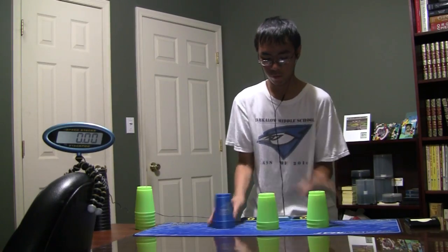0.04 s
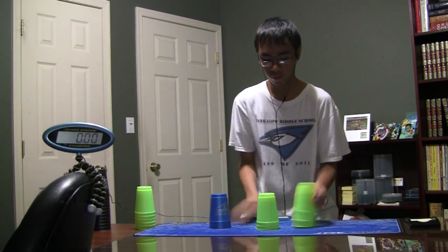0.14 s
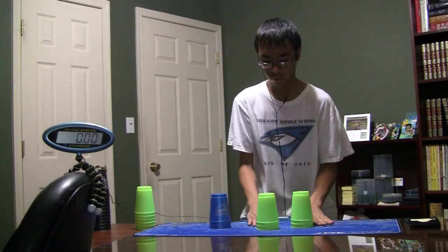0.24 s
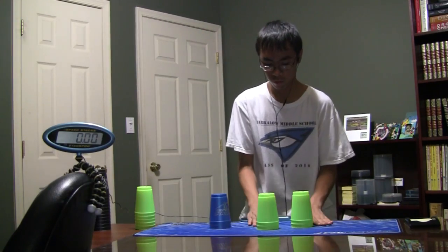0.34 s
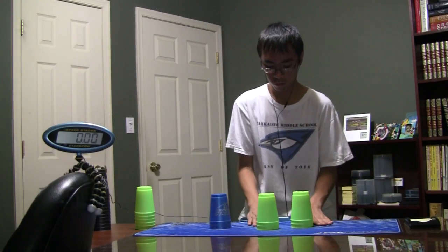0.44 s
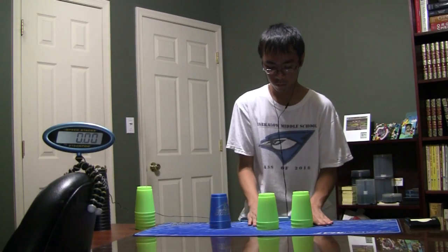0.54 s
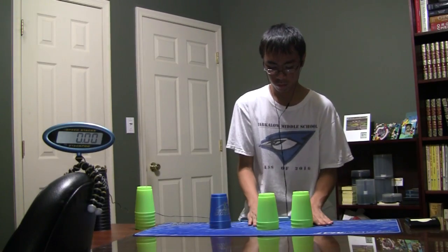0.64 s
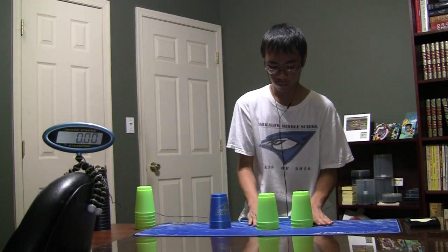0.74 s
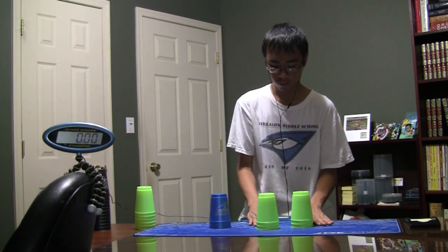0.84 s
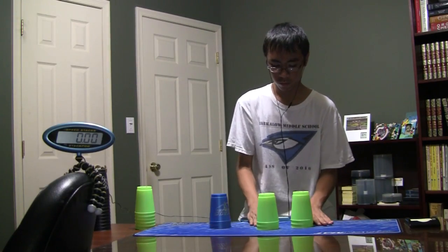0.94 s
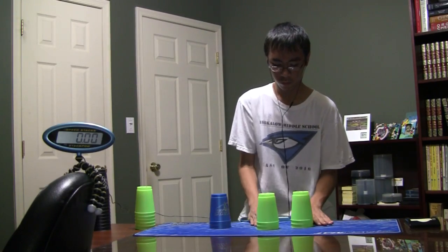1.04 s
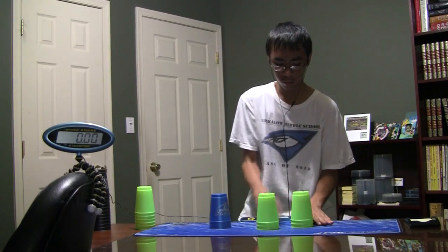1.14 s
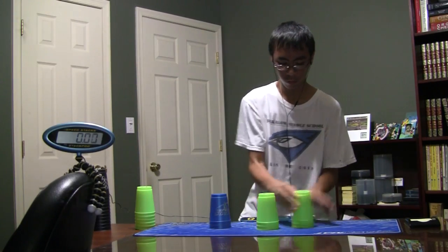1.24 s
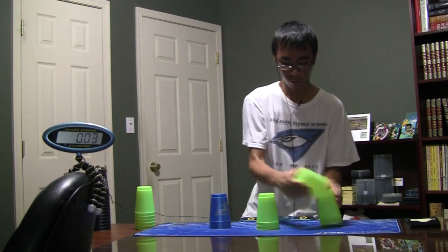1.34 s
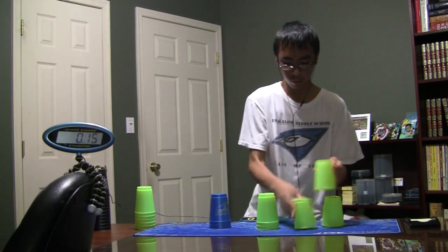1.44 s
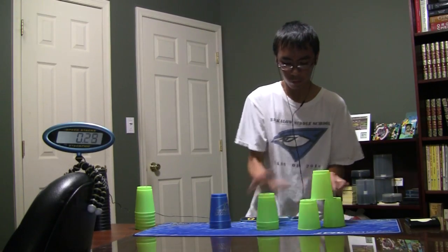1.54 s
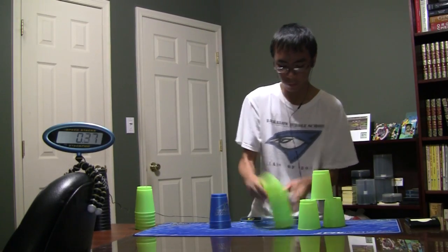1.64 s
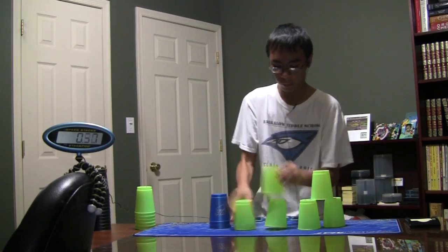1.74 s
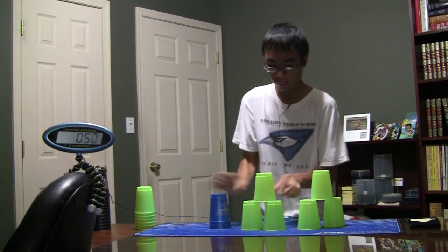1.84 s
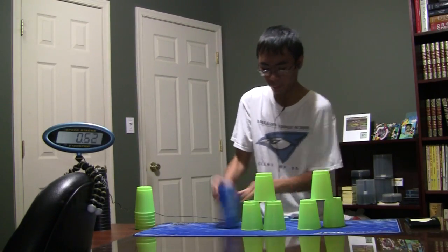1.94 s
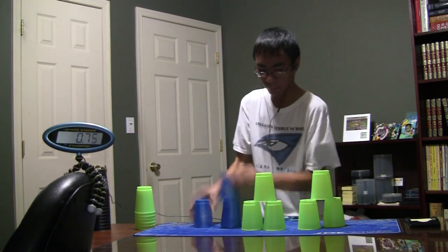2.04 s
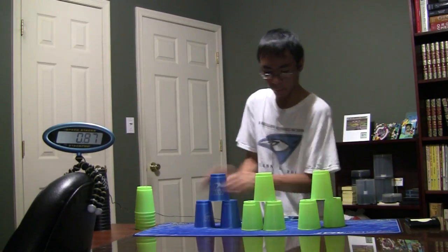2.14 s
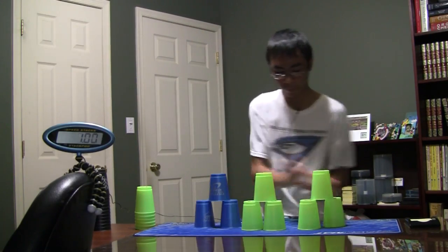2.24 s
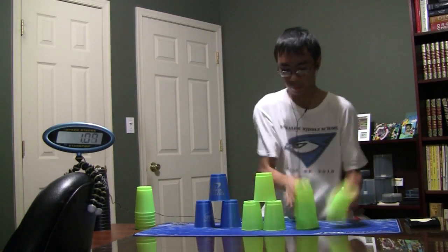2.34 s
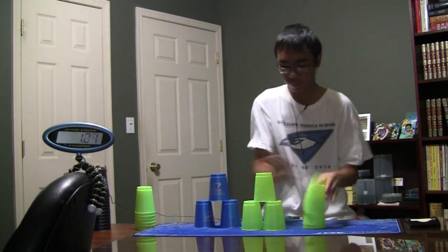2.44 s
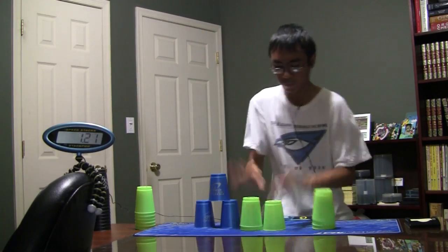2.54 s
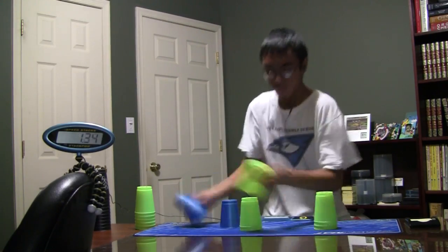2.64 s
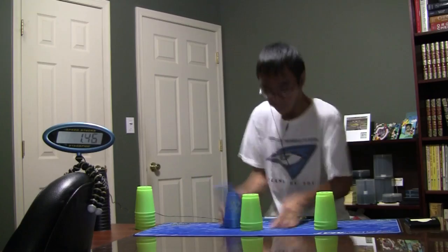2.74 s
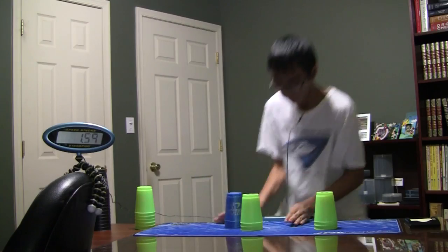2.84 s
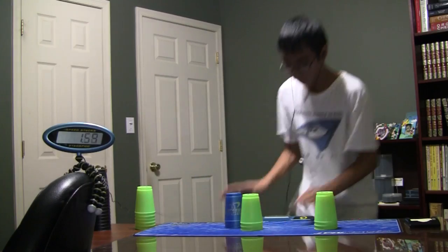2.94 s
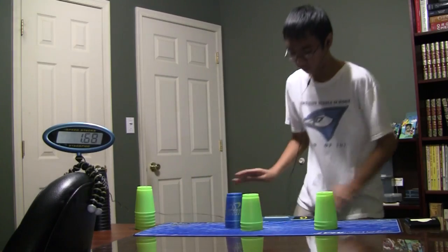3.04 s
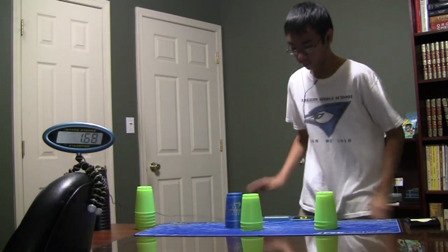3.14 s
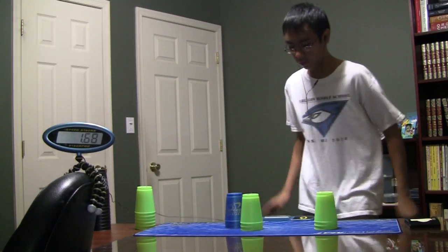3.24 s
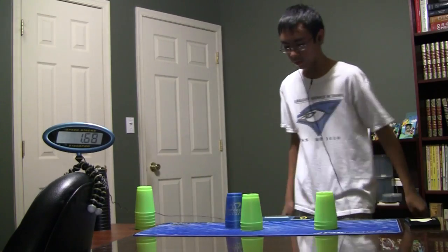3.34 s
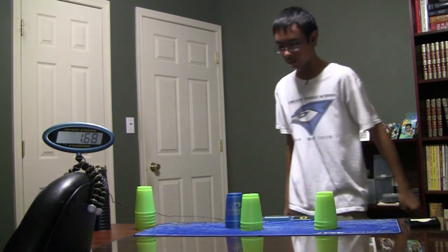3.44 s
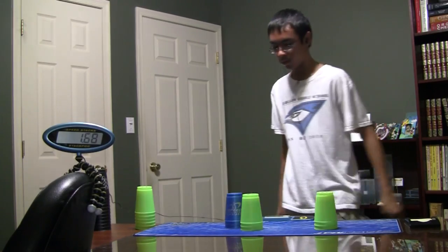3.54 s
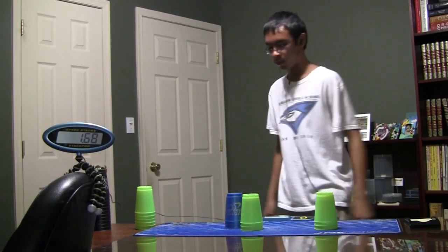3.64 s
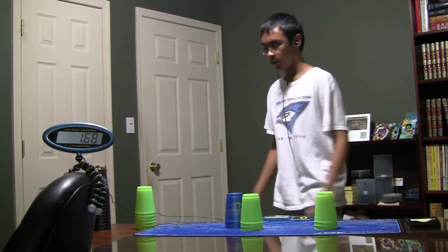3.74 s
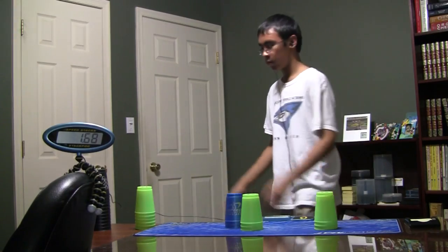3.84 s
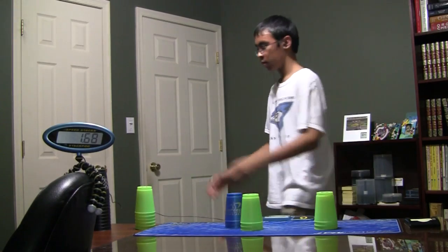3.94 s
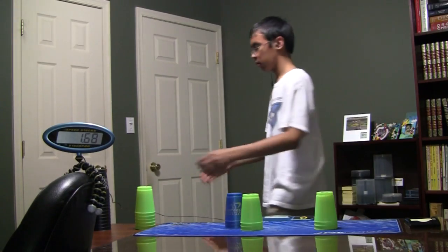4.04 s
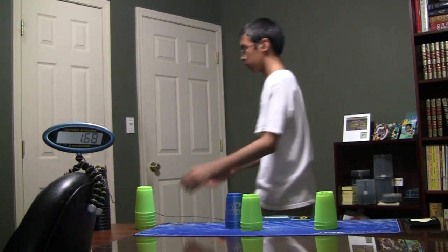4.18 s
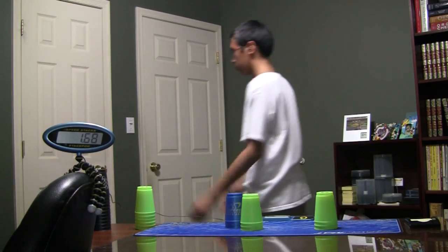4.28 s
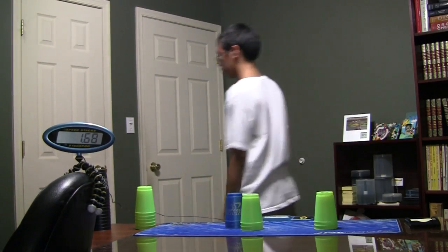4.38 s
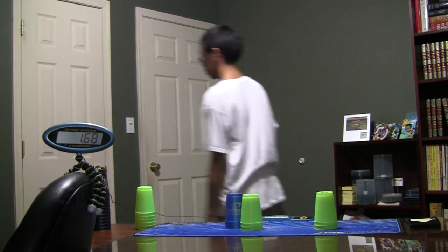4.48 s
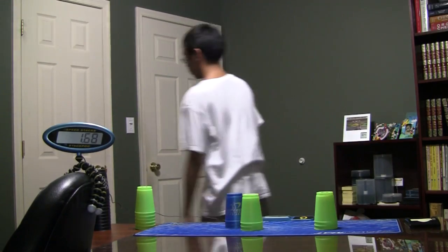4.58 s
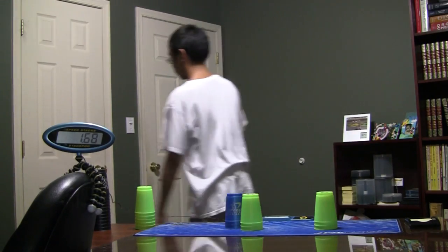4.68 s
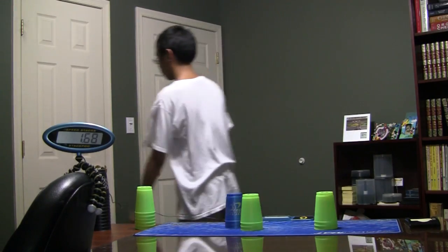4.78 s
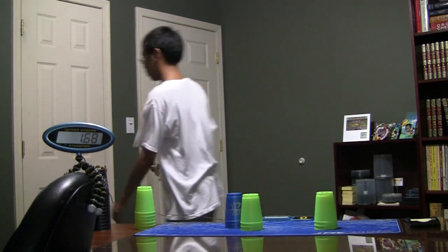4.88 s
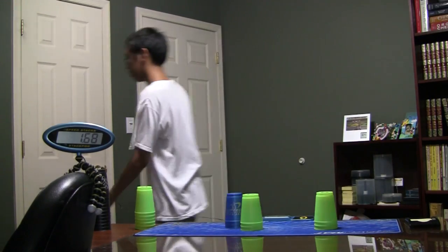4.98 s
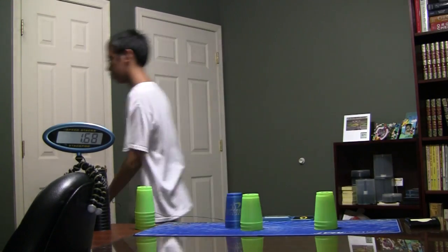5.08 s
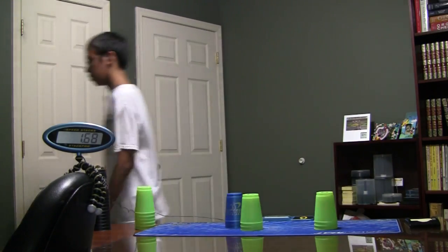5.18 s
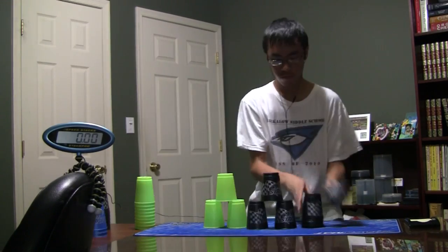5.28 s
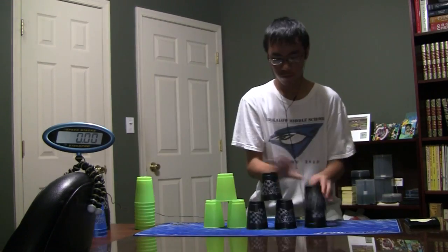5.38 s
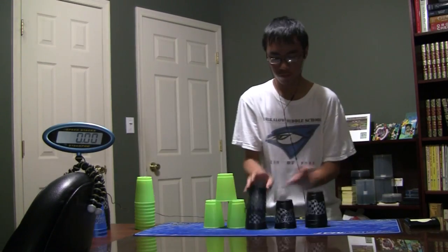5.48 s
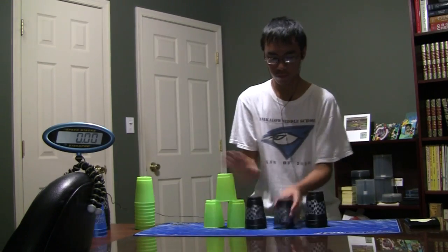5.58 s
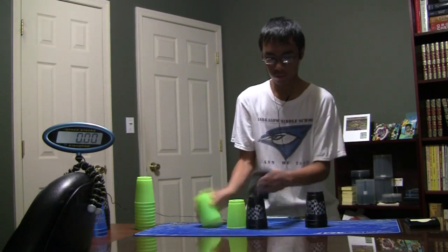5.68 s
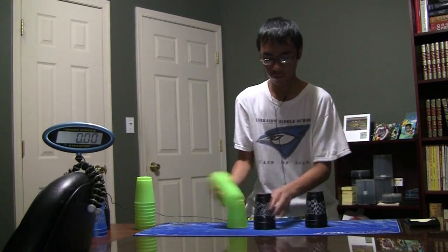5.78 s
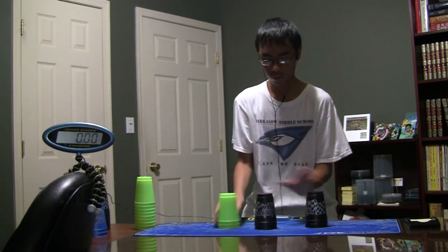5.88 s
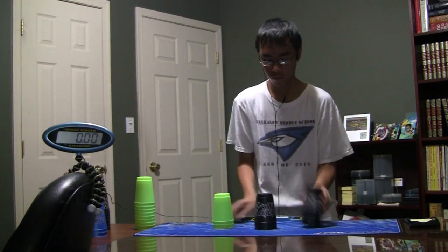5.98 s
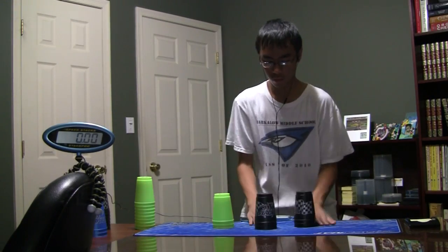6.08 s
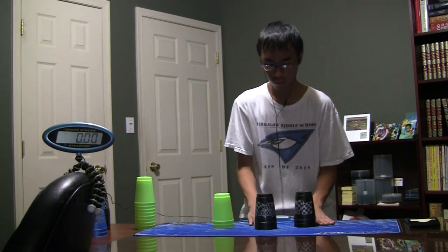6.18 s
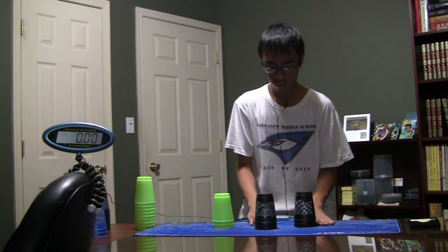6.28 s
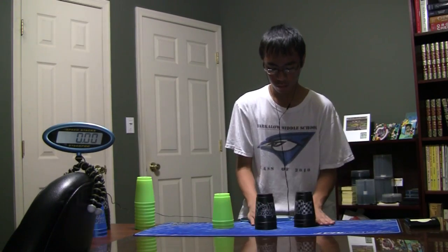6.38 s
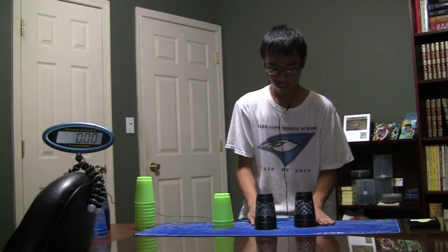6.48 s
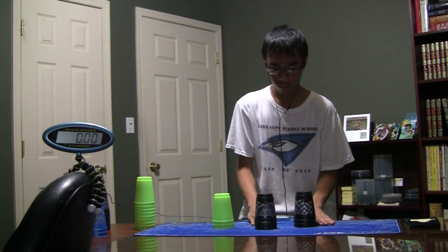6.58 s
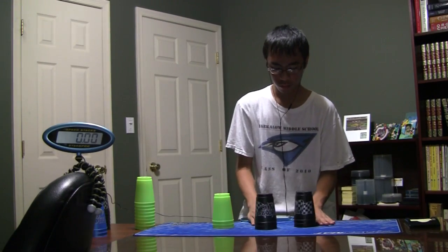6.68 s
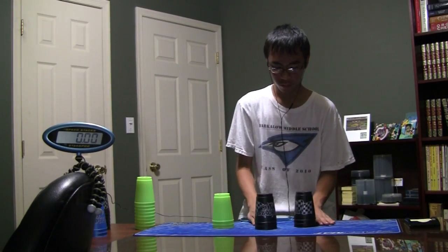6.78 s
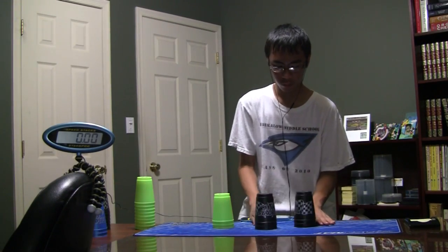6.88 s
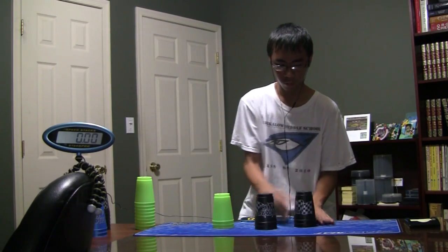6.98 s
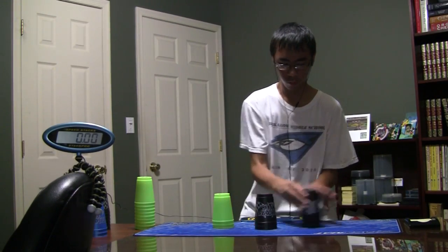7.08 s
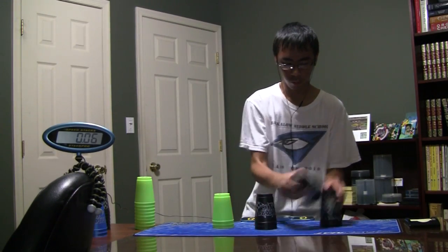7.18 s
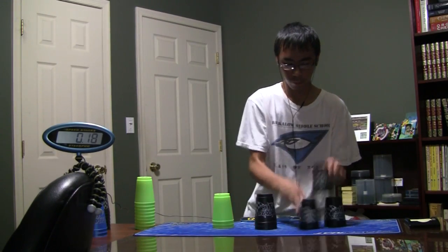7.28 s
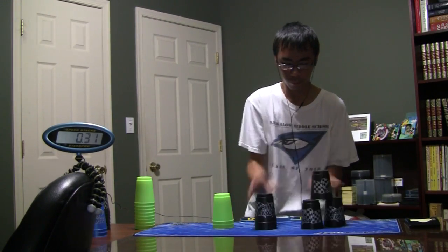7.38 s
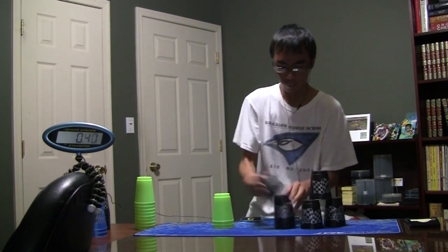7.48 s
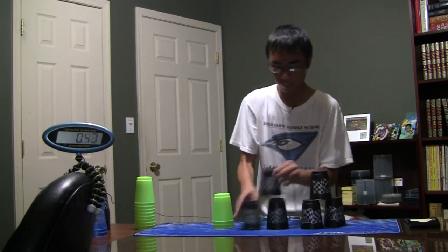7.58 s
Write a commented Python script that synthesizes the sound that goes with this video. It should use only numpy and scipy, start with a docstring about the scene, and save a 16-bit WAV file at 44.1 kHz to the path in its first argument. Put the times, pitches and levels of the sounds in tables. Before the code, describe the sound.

Rapid hollow clacks and scrapes of light plastic cups being stacked and collapsed, separated by low room noise, a soft step and a scuff.

```python
"""Stacking cups in a hard room

Plastic cups are built into pyramids and collapsed on a mat in quick runs, in a small hard room.
Each contact rings the air in a cup, clacks and cracks its wall with filtered noise, and thuds the table.
Sparse random clicks make the hiss and scrape of sliding cups and the scuff of a foot; a step booms low.
Filtered noise lies steadily under the pauses; the loudest hits overload the input."""
import sys
import numpy as np
from scipy import signal
from scipy.fft import rfft, irfft
from scipy.io import wavfile
from scipy.ndimage import uniform_filter1d

SR = 44100
rng = np.random.default_rng(int(sys.argv[2]) if len(sys.argv) > 2 else 0)


def waveform_to_disk(signal):
    """Save audio, clipped to [-1, 1], as 16-bit WAV at the path in sys.argv[1]."""
    frames = np.transpose(np.atleast_2d(signal))
    scaled = np.clip(frames, -1, 1) * 32767
    samples = np.round(scaled).astype(np.int16)
    wavfile.write(sys.argv[1], SR, samples)


N = 336042
FIRST_S = 0.015   # opening stretch of a contact over which its level is set


def from_db(db):
    """Gain of a level in dB."""
    return 10 ** (np.asarray(db) / 20)


def rms_one(x):
    """Scaled to rms 1."""
    return x / np.sqrt(np.mean(x ** 2) + 1e-20)


def firm(x):
    """Scaled to rms 1 over its first moments."""
    return x / np.sqrt(np.mean(x[..., :int(FIRST_S * SR)] ** 2) + 1e-20)


def decay(t, t60_s):
    """Exponential decay, 60 dB down after t60."""
    return from_db(-60 * t / t60_s)


def ring(t, hz, t60_s, rise_s):
    """A resonance: damped sine with a short rise."""
    return np.sin(2 * np.pi * hz * t) * decay(t, t60_s) * (1 - np.exp(-t / rise_s))


def at_hz(points, hz):
    """Value of a spectrum table at a frequency, interpolated along log frequency."""
    table_hz, values = np.array(points).T
    return np.interp(np.log(hz), np.log(table_hz), values)


def drift(knots_per_s):
    """Slow random wander: straight lines between normal draws."""
    knots = rng.standard_normal(int(N / SR * 60) + 4)
    return np.interp(np.arange(N) / SR * knots_per_s, np.arange(len(knots)), knots)


def coloured(x, spectrum):
    """x filtered to a spectrum; rms 1."""
    hz = np.maximum(np.arange(N // 2 + 1) * SR / N, 1)
    return rms_one(irfft(rfft(x) * from_db(at_hz(spectrum, hz)), N))


def air_rings(t, low_hz, open_hz, low_db, open_db, t60_s, grit):
    """Air in the cup rings low with its mouth covered, higher when open; smoothed noise roughens both."""
    covered = from_db(low_db) * firm(ring(t, low_hz, t60_s, rise_s=0.0015))
    uncovered = from_db(open_db) * firm(ring(t, open_hz, t60_s, rise_s=0.00026))
    roughness = rms_one(uniform_filter1d(grit, size=200))
    return (covered + uncovered) * (1 + (1 - np.exp(-t / 0.0075)) * roughness)


RATTLE_SHARE = 0.8   # rattle t60 as share of ring t60
SNAP_T60_S = 0.007
KNOCK_DB = 16   # first touch, added as one sample over the grit


def rim_burst(t, t60_s, grit):
    """Rims meet unevenly: a knock, a snap and a rattle of grit, partly its own on each side, drive the wall."""
    rattle = decay(t, RATTLE_SHARE * t60_s)
    snap = 1.5 * decay(t, SNAP_T60_S)
    burst = (grit[0] + 0.9 * grit[1:]) * (rattle + snap)
    burst[:, 0] += from_db(KNOCK_DB)
    return burst


# Table top modes. Each row: frequency in Hz, relative level in dB before random spread, t60 in seconds.
TABLE_MODES = [(142.8, -8, 0.062), (217, -3, 0.075), (265, -6, 0.043), (326.3, 2, 0.057),
               (375.5, 6.5, 0.046)]


def table_thud(t):
    """Table top modes struck together, their balance varying from hit to hit."""
    modes = 0
    for hz, db, t60_s in TABLE_MODES:
        spread_db = 2.0 * rng.standard_normal()
        modes = modes + from_db(db + spread_db) * ring(t, hz, t60_s, rise_s=0.0068)
    return firm(modes)


# Cup contacts; levels are rms over the first moments, before roughening and the low cut.
# Each row: start in seconds, low ring in Hz, open ring in Hz, clack in Hz, low ring level in dB,
# open ring level in dB, clack level in dB, crack level in dB, thud level in dB, ring t60 in seconds.
CONTACTS = [(0.003, 570, 960, 1800, -34, -33, -28.5, -43, -35, 0.027),
            (0.053, 553, 915, 1830, -19, -39, -33, -38, -41, 0.042),
            (0.077, 522, 785, 1850, -22.5, -29, -30, -36, -28, 0.025),
            (0.09, 386, 810, 1450, -36, -19.5, -14, -31, -22.5, 0.034),
            (0.228, 520, 947, 1670, -29.5, -48, -44, -44.5, -49, 0.051),
            (0.265, 556, 1313, 1780, -22.5, -20.5, -9.5, -25, -26.5, 0.033),
            (1.334, 520, 856, 1380, -27, -34, -34.5, -49, -31.5, 0.044),
            (1.418, 720, 760, 1720, -45, -21, -24, -33, -35.5, 0.062),
            (1.502, 497, 880, 2800, -35, -37, -46, -60, -30, 0.04),
            (1.524, 472, 861, 1550, -22.5, -20, -38, -48, -23, 0.031),
            (1.543, 530, 910, 1610, -27, -33, -47, -55, -28, 0.036),
            (1.573, 610, 892, 2800, -26, -1, -17.5, -21.5, -40, 0.031),
            (1.6, 630, 1065, 2210, -16, -10, -46, -51, -48, 0.031),
            (1.748, 552, 728, 2440, -29, -24, -18.5, -31.5, -48, 0.037),
            (1.767, 571, 940, 2530, -12, -17, -43, -30, -30.5, 0.04),
            (1.789, 641, 740, 2380, -20, -31, -48, -49, -45, 0.033),
            (1.835, 520, 738, 1400, -13.5, -12.5, -32, -38, -30, 0.029),
            (1.868, 656, 926, 2650, -14.5, -31, -50, -42, -34, 0.04),
            (1.885, 560, 934, 2800, -34, 0, -34, -27, -51, 0.055),
            (1.925, 649, 929, 1410, -12, -10.5, -54, -55, -33, 0.04),
            (2.063, 565, 920, 1920, -32, -25, -25.5, -36.5, -56, 0.044),
            (2.082, 570, 711, 1870, -14.5, -19, -31.5, -41, -49, 0.035),
            (2.104, 665, 750, 1410, -21, -34, -55, -54, -46, 0.035),
            (2.138, 625, 775, 1400, -14, -8.5, -17, -40, -26, 0.04),
            (2.183, 576, 783, 1500, -18, -3.5, -8, -22, -46, 0.031),
            (2.244, 705, 710, 1443, -26, -16.5, -50, -59, -45, 0.04),
            (2.375, 482, 913, 1570, -21.5, -15.5, -41, -42, -32, 0.034),
            (2.394, 479, 889, 2070, -20, -15.5, -38, -48, -29, 0.024),
            (2.409, 552, 1020, 1950, -24.5, -22.5, -37, -39, -27.5, 0.036),
            (2.458, 635, 802, 2680, -32, -36, -26.5, -30.5, -37, 0.04),
            (2.483, 641, 760, 1700, -28, -26.5, -17, -37, -39, 0.05),
            (2.519, 522, 942, 1940, -28, -14, -24, -27.5, -33, 0.042),
            (2.549, 491, 926, 2260, -19, -18.5, -29, -43, -24.5, 0.046),
            (2.575, 574, 958, 2110, -15.5, -16.5, -26.5, -47, -41, 0.042),
            (2.584, 528, 920, 2060, -29, -32, -34, -23.5, -30.5, 0.046),
            (2.623, 591, 956, 1900, -22, -25, -20.5, -32, -28.5, 0.049),
            (2.685, 576, 982, 1410, -18.5, -25.5, -22.5, -35, -27, 0.048),
            (2.698, 586, 970, 1460, -18.5, -16.5, -24, -34, -45, 0.03),
            (2.731, 637, 955, 2090, -35, -18, -12, -23, -44, 0.025),
            (2.776, 563, 1039, 1880, -18, -14, -35, -35, -24, 0.036),
            (2.8, 507, 925, 1980, -21.5, -19, -15, -30, -28, 0.027),
            (2.842, 598, 1260, 2020, -23, -21.5, -14, -22.5, -33, 0.028),
            (2.933, 634, 874, 2190, -36, -38, -30, -60, -64, 0.06),
            (5.295, 505, 880, 1380, -20, -19, -35, -39.5, -29.5, 0.044),
            (5.38, 640, 910, 1470, -30.5, -38, -22.5, -38, -37.5, 0.04),
            (5.437, 613, 900, 1550, -30, -25.5, -31, -38.5, -45, 0.066),
            (5.461, 593, 935, 1420, -29, -41, -41, -37, -38, 0.04),
            (5.479, 536, 920, 2060, -23.5, -17, -24.5, -27, -45, 0.04),
            (5.535, 437, 954, 1410, -26.5, -18, -43, -35, -34, 0.04),
            (5.562, 447, 875, 2270, -23, -43, -28.5, -27.5, -31, 0.038),
            (5.589, 427, 950, 2780, -23, -20.5, -29.5, -26, -29, 0.037),
            (5.63, 568, 990, 2710, -25, -47, -42, -45, -33, 0.036),
            (5.67, 467, 940, 1800, -32, -35, -26.5, -44, -41, 0.057),
            (5.723, 400, 1070, 1750, -28.5, -21.5, -46, -44, -27.5, 0.058),
            (5.741, 449, 1090, 2540, -22, -17, -47, -33.5, -37, 0.042),
            (5.765, 564, 1187, 2410, -15, -12.5, -13, -23.5, -43, 0.035),
            (5.848, 510, 867, 1410, -26, -15.5, -20, -29, -23, 0.025),
            (5.955, 467, 890, 1620, -27.5, -22, -18, -31.5, -23, 0.033),
            (6.107, 467, 1100, 1410, -33, -31, -44, -45, -40, 0.031),
            (6.125, 442, 1250, 2180, -14.5, -23, -22, -39, -28.5, 0.049),
            (6.134, 567, 1134, 1390, -15.5, -17, -13, -30, -12.5, 0.038),
            (6.176, 427, 1017, 1790, -26, -27, -43, -50, -35, 0.032),
            (6.225, 434, 940, 1660, -39, -42, -53, -61, -37, 0.037),
            (6.259, 390, 1034, 1940, -47, -45, -55, -64, -46, 0.04),
            (7.142, 500, 1330, 1400, -33.5, -40.5, -39, -55.5, -34.5, 0.048),
            (7.199, 430, 754, 1410, -42, -35.5, -62, -63, -56, 0.028),
            (7.229, 730, 720, 2620, -59, -25, -36, -33.5, -35, 0.044),
            (7.336, 522, 846, 1420, -19, -22, -30, -36.5, -18.5, 0.039),
            (7.391, 678, 908, 2720, -16.5, 0, -14.5, -21, -24, 0.027),
            (7.545, 665, 900, 1440, -36, -39, -45, -44, -25.5, 0.051),
            (7.571, 510, 960, 2630, -36, -43, -34.5, -33, -49, 0.037),
            (7.589, 563, 711, 1830, -19.5, -43, -51, -52, -35, 0.037)]


def contacts():
    """Each contact sums two air rings, a wall clack, a bright crack and a table thud."""
    out, t = np.zeros((2, N + SR)), np.arange(int(0.3 * SR)) / SR
    crack_band = signal.butter(1, [2800, 6500], "band", fs=SR, output="sos")
    for start_s, low_hz, open_hz, wall_hz, low_db, open_db, wall_db, crack_db, thud_db, t60_s in CONTACTS:
        grit = rng.standard_normal((3, len(t)))
        air = air_rings(t, low_hz, open_hz, low_db, open_db, t60_s, grit[1])
        burst = rim_burst(t, t60_s, grit)
        wall_band = signal.butter(2, [wall_hz / 1.456, wall_hz * 1.27], "band", fs=SR, output="sos")
        clack = from_db(wall_db) * firm(signal.sosfilt(wall_band, burst))
        crack = from_db(crack_db) * firm(signal.sosfilt(crack_band, burst))
        thud = from_db(thud_db) * table_thud(t)
        at = round(start_s * SR)
        out[:, at:at + len(t)] += air + clack + crack + thud
    # low cut on all contacts, thuds included
    return signal.sosfilt(signal.butter(4, 95, "high", fs=SR, output="sos"), out[:, :N] + 1e-18)


HISS_OVER_CRACK_DB, HISS_SHARE = 6.5, 1.76   # hiss t60 as multiple of ring t60


def slips():
    """Gain of the hiss after each contact, which sets the walls slipping."""
    out, t = np.zeros(N + SR), np.arange(int(0.3 * SR)) / SR
    for start_s, *_, crack_db, _thud_db, t60_s in CONTACTS:
        at = round(start_s * SR)
        out[at:at + len(t)] += from_db(crack_db + HISS_OVER_CRACK_DB) * decay(t, HISS_SHARE * t60_s)
    return out[:N]


# Cups sliding in and out of each other, hands and sleeves brushing.
# Each row: start in seconds, length in seconds, peak hiss gain in dB, peak scrape gain in dB.
SLIDES = [(-.03, 0.066, -30.5, -21.5), (.1, 0.18, -42.5, -32.5), (0.265, 0.072, -24, -20),
          (1.045, 0.36, -60.5, -60), (1.48, .1, -50, -55), (1.98, 0.098, -39.5, -30),
          (2.116, 0.12, -31.5, -12.5), (2.374, 0.11, -27.5, -29), (2.55, 0.11, -36, -24),
          (2.688, 0.07, -29, -17.5), (2.777, .12, -27.5, -19.5), (2.88, 0.26, -45, -41),
          (3.142, 0.16, -53, -48.5), (5.288, 0.098, -31, -55), (5.399, 0.06, -36, -26.5),
          (5.493, 0.093, -38, -26.5), (5.672, 0.095, -65, -31), (5.767, 0.11, -27, -17),
          (5.902, 0.15, -47, -32.5), (6.136, 0.078, -42.5, -26), (6.926, 0.2, -56, -55),
          (7.181, 0.14, -42.5, -34), (7.42, 0.11, -45, -43), (7.566, .1, -48, -36)]


def swells(column):
    """Gain of the slides: each swells and fades as half a sine, squared."""
    t, gain = np.arange(N) / SR, 0
    for row in SLIDES:
        start_s, length_s = row[:2]
        progress = np.clip((t - start_s) / length_s, 0, 1)
        gain = gain + from_db(row[column]) * np.sin(np.pi * progress) ** 2
    return gain


def rubbing(spectrum, clicks_per_s):
    """Dense uneven micro-clicks of two surfaces slipping, partly unlike on the two sides."""
    clicks = rng.standard_normal((3, N)) * (rng.random(N) < clicks_per_s / SR)
    grains = clicks * from_db(3 * drift(40))
    return coloured(grains[0] + 1.3 * grains[1:], spectrum)


# Hiss spectrum. Each row: frequency in Hz, relative level in dB per Hz.
HISS_COLOUR = [(900, -24), (2500, 13), (5000, 8), (9000, -0.5), (15000, -6)]


def hiss():
    """Bright slipping of cup walls, in slides and after contacts."""
    return (swells(column=2) + slips()) * rubbing(HISS_COLOUR, clicks_per_s=6200)


# Scrape spectrum. Each row: frequency in Hz, relative level in dB per Hz.
SCRAPE_SPECTRUM = [(300, 3), (900, 11.5), (1400, 3), (2300, -3.5), (3200, -55), (9000, -25)]


def scrape():
    """Duller, sparser slipping during the slides."""
    return swells(column=3) * rubbing(SCRAPE_SPECTRUM, clicks_per_s=3300)


# Foot scuff envelope. Each row: time in seconds, gain in dB.
SCUFF_LEVEL = [(4.475, -39), (4.495, -25.5), (4.53, -36), (4.57, -65), (4.65, -82), (4.72, -49), (4.8, -94)]
# Foot scuff spectrum. Each row: frequency in Hz, relative level in dB per Hz.
SCUFF_SPECTRUM = [(180, -19), (300, -10.5), (787, -3.5), (1030, -14), (1280, -14), (2510, -21), (3140, -23),
                  (14000, -45)]


def scuff():
    """A foot scuffs the floor: micro-clicks under a drawn envelope, silent outside it."""
    time_s, db = np.transpose(SCUFF_LEVEL)
    gain = from_db(np.interp(np.arange(N) / SR, time_s, db, left=-200, right=-200))
    return gain * rubbing(SCUFF_SPECTRUM, clicks_per_s=5900)


# Step back. Each row: start in seconds, gain in dB before rise and decay, frequency in Hz, t60 in seconds.
FOOTFALLS = [(3.04, -35.5, 53.3, 0.84)]


def footfall():
    """The floor booms under a step back: a slow, low damped sine."""
    t, boom = np.arange(N) / SR, 0
    for start_s, db, hz, t60_s in FOOTFALLS:
        boom = boom + from_db(db) * ring(np.maximum(t - start_s, 0), hz, t60_s, rise_s=0.11)
    return boom


# Left-right likeness of room sound. Each row: frequency in Hz, likeness from 0 to 1.
STEREO_LIKENESS = [(60, 1), (300, 0.92), (700, 0.76), (1500, 0.15), (4000, 0.067), (12000, 0)]


def bands(size):
    """Half-octave bands of stereo noise with the likeness of the room: (centre Hz, noise)."""
    edges_hz = 25 * 2 ** np.arange(0, 9.6, 0.5)
    white = rng.standard_normal((2, 2, size))   # two pairs, so neighbouring bands differ
    for k, (low_hz, high_hz) in enumerate(zip(edges_hz, edges_hz[1:])):
        band = signal.butter(2, [low_hz, high_hz], "band", fs=SR, output="sos")
        mid, side = signal.sosfilt(band, white[k % 2])
        centre_hz = np.sqrt(low_hz * high_hz)
        alike = at_hz(STEREO_LIKENESS, centre_hz)
        yield centre_hz, np.sqrt(1 + alike) * mid + np.sqrt(1 - alike) * side * [[1], [-1]]


# Reverberation. Each row: frequency in Hz, t60 in seconds before the fast first decay.
TAIL_T60 = [(100, 0.46), (700, 0.51), (1800, 0.41), (12000, 0.43)]
# Nearest walls. Each row: nominal delay in seconds, level in dB.
WALL_ECHOES = [(.0045, -7.5), (.011, -7.5), (.027, -9), (.043, -26)]
TAIL_DB = 6   # tail energy per side, without wall echoes


def tail_of_room():
    """Wall echoes, a little apart on each side, then a tail that dies band by band."""
    t = np.arange(int(0.8 * SR)) / SR
    tail = sum(noise * decay(t, at_hz(TAIL_T60, hz)) for hz, noise in bands(size=len(t)))
    near_furniture = 1 + 0.65 * np.exp(-t / 0.057)   # fast first decay
    tail = tail * (1 - np.exp(-t / 0.00095)) * near_furniture
    tail = from_db(TAIL_DB) * tail / np.sqrt(np.sum(tail ** 2) / 2)
    for k, (delay_s, db) in enumerate(WALL_ECHOES):
        lag = round(delay_s * rng.uniform(0.9, 1.1) * SR)
        side_shift = np.array([3, -3]) * (-1) ** k   # samples
        tail[[0, 1], lag + side_shift] += from_db(db)
    return tail


def room(x, count=4, turns_per_s=9):
    """Random room tails take turns, crossfading on a fixed clock, so no one tail's resonances persist."""
    turn = np.arange(N) / SR * turns_per_s % count
    mono = x.mean(axis=0)
    out = 0
    for k in range(count):
        away = np.abs((turn - k + count / 2) % count - count / 2)
        share = np.cos(np.pi / 2 * np.minimum(away, 1))
        out = out + signal.fftconvolve((share * mono)[None], tail_of_room(), axes=1)[:, :N]
    return out


# Room noise spectrum. Each row: frequency in Hz, relative level in dB per Hz.
NOISE_COLOUR = [(15, -61), (25, -17), (48, -25.5), (134, -6.5), (161, -5), (190, 0), (223, -4.5),
                (373, 1.5), (415, -3), (607, -8.5), (658, -13.5), (713, -8), (1040, -16.5), (6030, -33),
                (16000, -36.5)]
NOISE_RMS_DB = -40   # before left bias and input


def room_noise():
    """Steady airy rumble of noise bands, each flickering a little."""
    rumble = 0
    for hz, noise in bands(size=N):
        flicker_db = 1.0 * drift(3.8)
        rumble = rumble + from_db(at_hz(NOISE_COLOUR, hz) + flicker_db) * noise
    return from_db(NOISE_RMS_DB) * rms_one(rumble)


LEFT_OVER_RIGHT_DB = 1.65


def scene():
    """Contacts, slides and steps in the room, over its noise."""
    near = contacts() + hiss() + scrape() + scuff()
    sides = from_db(LEFT_OVER_RIGHT_DB * np.array([[0.5], [-0.5]]))
    return (near + room(near) + room_noise() + footfall()) * sides


LIMIT_DB, SQUEEZE = -2, 1.0   # gain control: threshold, share of the excess dB removed
LATE_S, ATTACK_S, RELEASE_DB_PER_S = 0.01, 0.0076, 69   # delay, smoothing time, fall before smoothing
CUTOFF_HZ = 16100


def record(dry):
    """Bass and treble roll off; gain control comes too late for the loudest attacks, which clip; the top is cut."""
    dry = signal.sosfilt(signal.butter(2, [45, 9500], "band", fs=SR, output="sos"), dry)
    peak_db = 20 * np.log10(np.abs(dry).max(axis=0) + 1e-9)
    over_db = np.maximum(peak_db - LIMIT_DB, 0)
    # peaks held, falling at the release rate
    ramp_db = RELEASE_DB_PER_S * np.arange(N) / SR
    held_db = np.maximum.accumulate(over_db + ramp_db) - ramp_db
    late_db = np.interp(np.arange(N) - LATE_S * SR, np.arange(N), held_db)
    r = np.exp(-1 / (ATTACK_S * SR))
    cut_db = SQUEEZE * signal.lfilter([1 - r], [1, -r], late_db)
    overloaded = np.clip(dry * from_db(-cut_db), -0.97, 0.97)
    top_cut = signal.cheby2(10, 40, CUTOFF_HZ, fs=SR, output="sos")
    return np.clip(signal.sosfilt(top_cut, overloaded), -1, 1)


dry = scene()
out = record(dry)
waveform_to_disk(out)
```